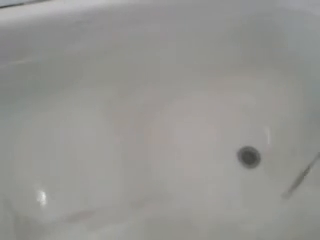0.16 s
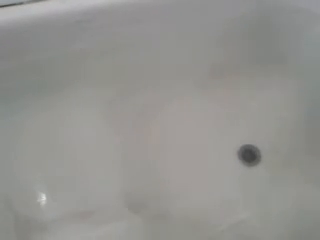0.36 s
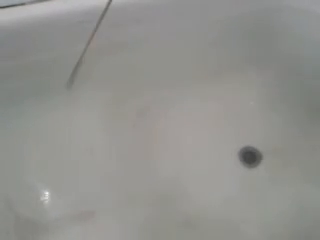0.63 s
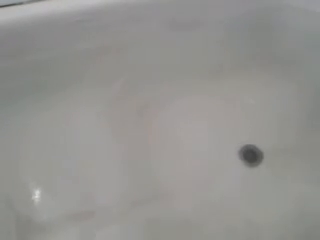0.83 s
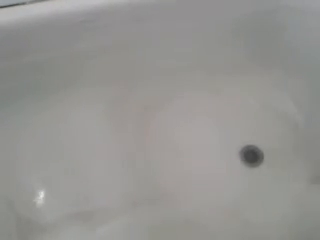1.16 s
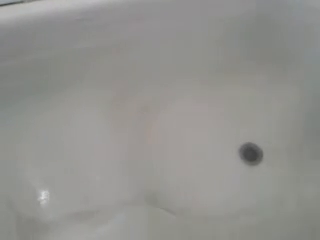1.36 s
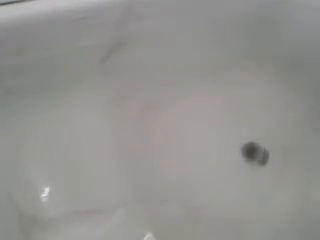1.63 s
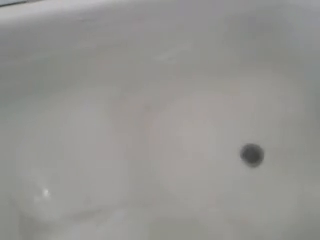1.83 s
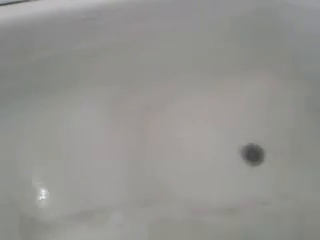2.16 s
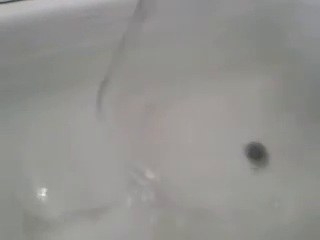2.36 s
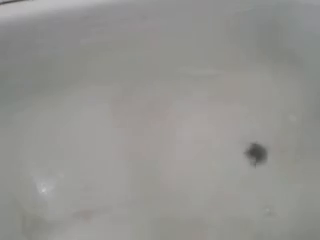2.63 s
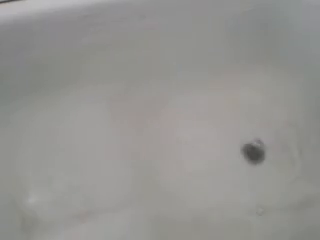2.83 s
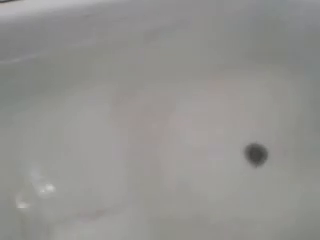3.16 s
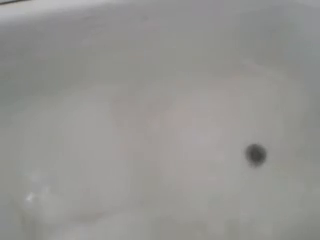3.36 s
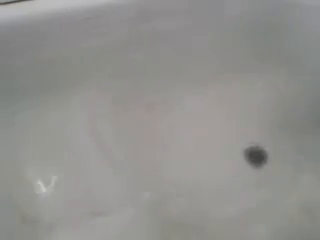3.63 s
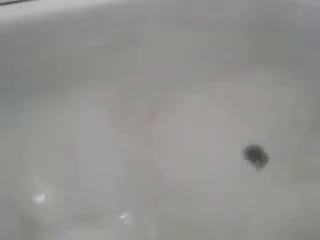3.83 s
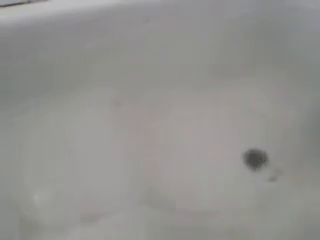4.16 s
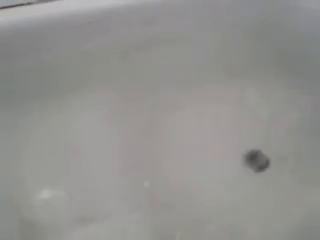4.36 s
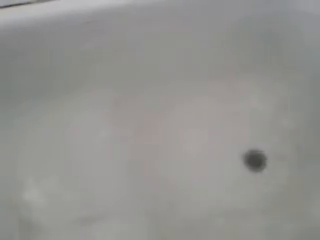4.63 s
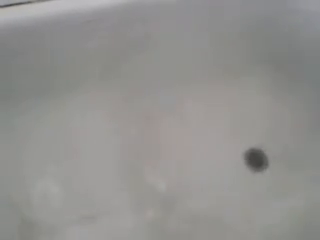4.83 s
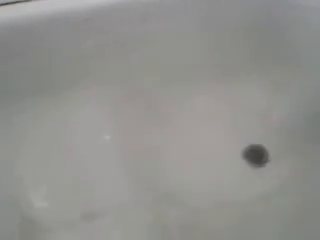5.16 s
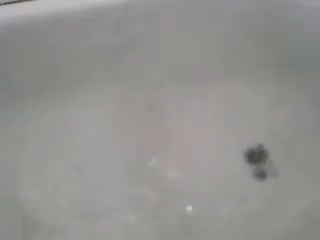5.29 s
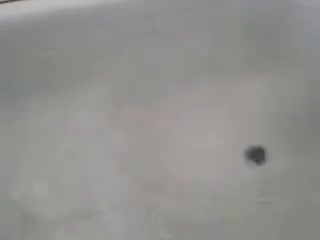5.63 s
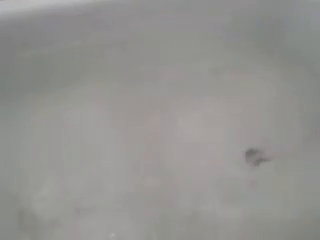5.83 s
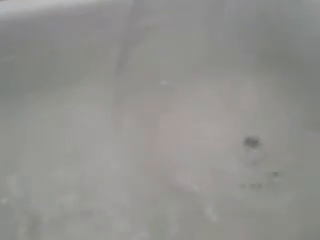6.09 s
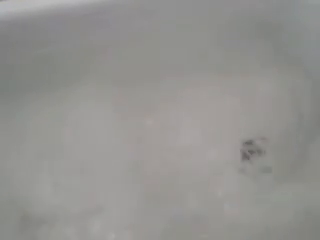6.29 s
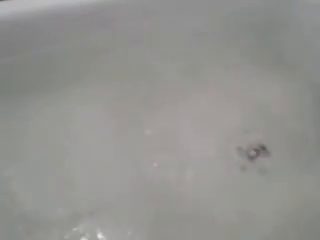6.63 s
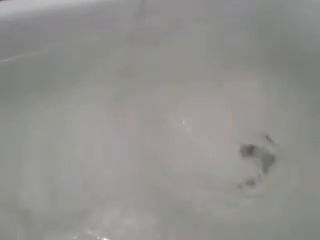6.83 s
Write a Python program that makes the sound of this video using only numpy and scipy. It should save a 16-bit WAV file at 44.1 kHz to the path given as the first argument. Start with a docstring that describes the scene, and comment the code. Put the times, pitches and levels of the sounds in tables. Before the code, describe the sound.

Water drips, laps and bubbles in a bathtub as a small lure is drawn around, growing busier and louder.

```python
"""A small metal lure is drawn round and round on a line through a bathtub, faster and faster.
First one drop plinks and two hard clacks ring in the bathroom, over a low hum that soon turns faint.
Then wavelets lap and more drops land, each trapping air that rings as a bubble. From about two seconds
on, air pockets glug with a rising pitch, and a spray of tiny bubbles thickens toward the end.
All along, tub walls and tiles echo the water over a soft room hiss."""
import sys
import numpy as np
from scipy import signal
from scipy.fft import rfft, irfft
from scipy.io import wavfile

SR = 44100
rng = np.random.default_rng(int(sys.argv[2]) if len(sys.argv) > 2 else 0)


def dump(signal):
    """Clip the signal to [-1, 1] and save it as 16-bit WAV at the path in sys.argv[1]."""
    limited = np.clip(np.atleast_2d(signal).T, -1, 1)
    pcm = np.round(limited * 32767).astype(np.int16)
    wavfile.write(sys.argv[1], SR, pcm)


N = 307377

# drops that stand out, each trapping a bubble:
# (time [s], pitch [Hz], peak level [dB], time to fade to about a third [cycles])
DROPS = [(.019, 5720, -36.5, 10.5), (1.094, 1930, -40, 4.3), (1.094, 3580, -37.5, 0.56),
         (1.267, 4700, -38, 2.1), (1.318, 2130, -46, 19), (1.552, 3900, -39, 4.7), (2.058, 5630, -42.5, 12),
         (2.084, 2650, -37, 1.6), (2.134, 5000, -29.5, 2.8), (2.279, 3220, -38.5, 3.9),
         (2.326, 5040, -41.5, 24), (2.409, 1720, -48, 12), (2.57, 2994, -46, 18), (2.579, 6600, -38, 11),
         (2.715, 5740, -39, 23), (2.805, 4630, -34.5, 13), (2.815, 4160, -30, 12), (2.815, 6120, -34.5, 13),
         (2.823, 3750, -26.5, 5), (3.076, 5300, -35.5, 7), (3.121, 3050, -42.5, 10), (3.186, 6250, -33, 20),
         (3.314, 6320, -41.5, 9.9), (3.345, 4970, -35, 5.7), (3.369, 4700, -36.5, 6.3),
         (3.433, 5104, -40, 16), (3.467, 6000, -39, 7), (3.492, 5380, -39.5, 13), (3.618, 6540, -37, 24.3),
         (3.650, 5203, -33.5, 7), (3.711, 6070, -23, 2.6), (3.839, 5800, -41, 11), (3.886, 3000, -41, 4.9),
         (3.903, 5170, -39, 8), (3.9649, 6090, -20.5, 3.6), (4.058, 5400, -30.5, 11.5),
         (4.1, 6170, -36, 20), (4.235, 5800, -26.5, 8), (4.311, 5200, -31, 9), (4.328, 3220, -36, 2),
         (4.455, 5830, -35.5, 11), (4.551, 6120, -28.5, 19), (4.572, 5690, -19, 6.1),
         (4.589, 5500, -27.5, 4.5), (4.644, 5070, -22.5, 8.3), (4.646, 3160, -25.5, 2.4),
         (4.657, 5600, -25, 5.8), (4.679, 3850, -31, 17), (4.737, 5850, -28.5, 11),
         (4.74, 3410, -24.5, 2.3), (4.794, 6420, -31.5, 18), (4.872, 5300, -29.5, 5.3),
         (4.93, 6130, -26, 10.4), (5.068, 5870, -37.5, 9), (5.125, 6150, -19, 5.5),
         (5.147, 3120, -29.5, 12), (5.149, 5300, -25, 6.4), (5.179, 6700, -30, 24), (5.181, 2390, -37, 30),
         (5.196, 7200, -23.5, 9), (5.262, 6160, -25.5, 6.9), (5.342, 6000, -23.5, 4.8),
         (5.416, 4750, -23.5, 7.2), (5.491, 2460, -25, 1.1), (5.492, 5130, -31.5, 3.6),
         (5.518, 4300, -31, 6.1), (5.561, 4600, -23, 7.7), (5.657, 2964, -26.5, 8.7),
         (5.708, 3410, -35, 21), (5.717, 1680, -27.5, 2.8), (5.794, 3395, -35, 45),
         (5.795, 1376, -31, 11.3), (5.806, 3660, -23.5, 8.5), (5.842, 6950, -25.5, 28),
         (5.847, 5930, -14.5, 3.6), (5.854, 2678, -19.5, 3.5), (5.967, 5430, -27.5, 15),
         (5.996, 6630, -25.5, 9.5), (5.998, 2500, -31.5, 5.5), (6.015, 4550, -29, 9.6),
         (6.0345, 2897, -18, 8.7), (6.0351, 6380, -19.5, 11), (6.036, 3840, -22.5, 12),
         (6.184, 6340, -27.5, 11), (6.225, 5180, -27.5, 24), (6.233, 4300, -20.5, 20),
         (6.237, 5770, -13.5, 3), (6.239, 2310, -27.5, 4.9), (6.268, 5700, -20.5, 6.1),
         (6.271, 2940, -30.5, 7), (6.302, 5270, -28.5, 10), (6.34, 2770, -27.5, 10.4),
         (6.354, 6440, -14.5, 9.5), (6.354, 2265, -34, 21), (6.39, 5540, -21.5, 5.6),
         (6.396, 4300, -21.5, 2.9), (6.513, 5460, -31, 14), (6.595, 5020, -18, 5), (6.645, 5880, -28, 23.7),
         (6.844, 1924, -29.5, 3), (6.847, 2890, -22, 1.5), (6.941, 3490, -28, 13)]


def spray(spots, base_per_s=200, base_db=-50, doubling_db=7.5):
    """The line tears the surface into bubbles: high plinks, ticks and crackle, lower burble and gurgle."""
    fine_db, coarse_db = stirring()
    rate = base_per_s * 2 ** ((fine_db - base_db) / doubling_db)  # louder spray has more bubbles
    plinks = swarm(spots, fine_db - 7, .16 * rate, low_hz=2646, high_hz=5570, cycles=26, scatter_db=9)
    ticks = swarm(spots, fine_db - 5, .5 * rate, low_hz=4530, high_hz=7110, cycles=17, scatter_db=10.5)
    crackle = swarm(spots, fine_db - 6, 4 * rate, low_hz=2640, high_hz=8640, cycles=1.6, scatter_db=16)
    burble = swarm(spots, coarse_db - 7, 1.1 * rate, low_hz=1075, high_hz=2840, cycles=5.8, scatter_db=23)
    gurgle = swarm(spots, coarse_db - 9.5, .5 * rate, low_hz=1355, high_hz=1865, cycles=8, scatter_db=15)
    return plinks + ticks + crackle + burble + gurgle


def stirring(clumps_per_s=35, clump_db=3, still_db=-64, split_hz=3800):
    """Levels in dB of fine spray and larger bubbles, stirred up by the lure and thrown up by drops."""
    # how hard the lure stirs: (time [s], fine spray [dB], larger bubbles [dB])
    stir_levels = [(1.0, -65, -70), (1.9, -66, -70.5), (2.25, -62, -62.5), (2.43, -65, -65),
                   (3.08, -62, -62), (3.59, -55, -63), (4.04, -54.5, -65.5), (4.26, -53, -61.5),
                   (4.51, -52, -59.5), (4.74, -47, -67.5), (4.96, -49, -76), (5.16, -47.5, -64.5),
                   (5.34, -45, -52), (5.77, -49.5, -54), (5.96, -48.5, -56), (6.4, -44.5, -50),
                   (6.67, -49, -50), (6.97, -44.5, -47)]
    clock = np.arange(N) / SR
    jumps = rng.standard_normal(1000)
    clumps = undb(clump_db * np.interp(clock * clumps_per_s, np.arange(len(jumps)), jumps))
    power = undb(curve(stir_levels, clock)) ** 2
    broken = power ** 2 / (power ** 2 + undb(still_db) ** 4)  # below still_db the surface hardly breaks
    fine, coarse = power * broken * unit(clumps) ** 2
    # each drop's spatter swells quickly, then settles
    t = np.arange(int(.5 * SR)) / SR
    spatter = (1 - np.exp(-t / .003)) * np.exp(-t / .014)
    spatter /= spatter.max()
    for s, hz, db, _ in DROPS:
        fine_share = 1 / (1 + (split_hz / hz) ** 4)  # higher drops throw mostly fine spray
        add(fine, s, fine_share * undb(db - 31) ** 2 * spatter)
        add(coarse, s, (1 - fine_share) * undb(db - 30) ** 2 * spatter)
    return 10 * np.log10(fine), 10 * np.log10(coarse)


def swarm(spots, level_db, rate, low_hz, high_hz, cycles, scatter_db):
    """Small bubbles ring at random, about `rate` of them a second; level_db sets their joint level."""
    births = np.flatnonzero(rng.random(N) < rate / SR)
    chance = rng.random((len(births), 3))
    gains = unit(undb(scatter_db * chance[:, 0] ** 2))
    out = np.zeros((spots, N))
    for k, (i, gain, (_, pitch, ring)) in enumerate(zip(births, gains, chance)):
        hz = low_hz + (high_hz - low_hz) * pitch
        ring_cycles = cycles * (.5 + ring)
        overlap = max(rate[i] * ring_cycles / hz / 4, .013)  # the lower limit keeps calm water quiet
        add(out[k % spots], i / SR, gain * undb(level_db[i]) / np.sqrt(overlap) * bubble(hz, ring_cycles))
    return out


def bubble(hz, cycles, glide=.05, swell_cycles=.93):
    """A bubble rings and dies away; its pitch creeps up as it nears the surface."""
    turns = np.arange(int(5 * cycles * SR / hz)) * hz / SR
    loudness = (1 - np.exp(-turns / swell_cycles)) * np.exp(-turns / cycles)
    phase = 2 * np.pi * turns * (1 + glide * turns / cycles / 2)
    return loudness / loudness.max() * np.sin(phase)


def drops(spots, tick_db=-8, splat_db=-15):
    """Each drop ticks as it lands, splats for a few milliseconds and leaves a ringing bubble."""
    t = np.arange(int(.02 * SR)) / SR
    fade = np.exp(-t / .0025)
    tick = bubble(hz=4600, cycles=.9, swell_cycles=.5)
    out = np.zeros((spots, N))
    for k, (s, hz, db, cycles) in enumerate(DROPS):
        noise = rng.standard_normal(len(t))
        splat = resonate(resonate(noise, hz, width_hz=hz), hz, width_hz=hz)
        add(out[k % spots], s, undb(db + tick_db) * tick)
        add(out[k % spots], s, undb(db + splat_db) * fade * unit(splat))
        add(out[k % spots], s, undb(db) * bubble(hz, cycles))
    return out


def glugs(spots, overtone_db=-22):
    """A pocket of air holds its note, then sweeps up ever faster as it opens to the surface."""
    # air pockets closing behind the lure:
    # (time [s], starting pitch [Hz], level [dB], length [s], rise [octaves])
    pockets = [(2.186, 1222, -41.5, 0.011, 0.089), (2.205, 1657, -38.5, 0.015, 1.12),
               (3.728, 1100, -49, 0.016, 0.27), (4.546, 911, -48.5, 0.029, 0.14),
               (5.353, 1047, -34, 0.04, 1.02), (5.493, 1674, -36, 0.02, 0.08),
               (5.505, 740, -46, 0.031, 0.43), (5.889, 1218, -32.5, 0.02, 0.87),
               (6.109, 1770, -29.5, 0.01, 0.21), (6.110, 877, -35, 0.05, 1),
               (6.635, 854, -32.5, 0.048, 1.32)]
    out = np.zeros((spots, N))
    for k, (s, hz, db, length, octaves) in enumerate(pockets):
        age = np.linspace(0, 1, int(length * SR))
        # the pocket's wobbling walls shake its pitch and its loudness
        wobbles = rng.standard_normal((2, 18))
        shake, throb = (np.interp(age, np.linspace(0, 1, len(row)), row) for row in wobbles)
        pitch_hz = hz * (1 + .06 * shake) * 2 ** (octaves * age ** 2)
        phase = 2 * np.pi * np.cumsum(pitch_hz) / SR
        tone = np.sin(phase) + undb(overtone_db) * np.sin(2 * phase)
        flutter = unit(undb(3.5 * throb))
        swell = np.interp(age, [0, .1, .55, .9, 1], [0, 1, 1, .6, 0])
        add(out[k % spots], s, undb(db) * swell * flutter * tone)
    return out


def laps(spots, count=14, spread=.1, cycles=5):
    """A lapping wavelet folds in a handful of bubbles of about one size."""
    # wavelets meeting the tub's side: (time [s], pitch [Hz], level [dB])
    wavelets = [(.87, 1484, -56.5), (1.55, 925, -63.5), (1.76, 684, -62), (2.04, 1443, -60),
                (2.212, 2400, -52.5), (2.83, 1608, -51.5), (3.175, 1444, -56), (3.74, 1320, -70),
                (4.115, 2140, -46.5), (4.12, 1236, -60.5), (4.27, 1524, -58), (4.37, 1670, -57.5),
                (4.48, 1190, -57.5), (5.22, 370, -64), (5.51, 358, -61), (5.755, 1190, -48),
                (6.0, 1225, -49), (6.125, 1430, -40.5), (6.43, 880, -48.5), (6.74, 820, -55.5)]
    out = np.zeros((spots, N))
    for k, (s, hz, db) in enumerate(wavelets):
        fold_s = min(50 / hz, .053)  # a bigger, lower wavelet takes longer to fold
        overlap = count / fold_s * cycles / hz / 2
        for j, (when, pitch, strength) in enumerate(rng.random((count, 3))):
            start_s = s + fold_s * (j + when) / count
            bubble_hz = hz * (1 + spread * (2 * pitch - 1))
            gain = undb(db) * (.5 + strength) / np.sqrt(overlap)
            add(out[k % spots], start_s, gain * bubble(bubble_hz, cycles))
    return out


def clacks(hold_s=.027):
    """Hard clacks heard mostly by way of the tiles: a dense ring whose low notes come late and stay."""
    # clacks away from the water: (time [s], level [dB])
    hits = [(0.446, -38.5), (.690, -35.5)]
    # notes the clacking thing rings with: (pitch [Hz], width [Hz], relative level [dB])
    notes = [(270, 44, -43), (410, 96, -17.5), (680, 370, -14), (1802, 45, -6.5), (2620, 380, -4.5),
             (2853, 14, 4.5), (3420, 11, 9), (3740, 26, 9.5), (3970, 134, 3), (5840, 100, 0.5),
             (6150, 600, -7)]
    t = np.arange(int(.5 * SR)) / SR
    out = np.zeros(N)
    for s, db in hits:
        ring = 0
        for hz, width_hz, note_db in notes:
            rise_s, fade_s = (.02, .81) if hz < 1000 else (.002, .29)
            loudness = (1 - np.exp(-t / rise_s)) * undb(-60 * np.maximum(t - hold_s, 0) / fade_s)
            ring += undb(note_db) * loudness * resonate(rng.standard_normal(len(t)), hz, width_hz)
        add(out, s, undb(db) * ring / np.std(ring[t < .04]))
    return out


def bathroom(x, wall_db=-8, tile_db=-7, hollow_db=-3, tile_fade_s=.22, hollow_fade_s=.27):
    """The sound from one spot, plus quick echoes off the tub's walls and the ring of the tiled room."""
    t = np.arange(int(.5 * SR)) / SR
    noise = rng.standard_normal((3, len(t)))
    bounces = rng.random(len(t)) < .06
    walls = noise[0] * bounces * (t > .0015) * np.exp(-t / .005)
    tiles = noise[1] * (t > .004) * undb(-60 * t / tile_fade_s)
    hollow = noise[2] * (t > .004) * undb(-60 * t / hollow_fade_s)
    walls, tiles, hollow = (part / np.linalg.norm(part) for part in (walls, tiles, hollow))
    # the hollow of the tub holds the low notes longer
    hollow = signal.lfilter(*signal.butter(2, 2200, fs=SR), hollow)
    echoes = undb(wall_db) * walls + undb(tile_db) * tiles + undb(hollow_db) * hollow
    return x + signal.fftconvolve(x, echoes)[:N]


def low_hum():
    """A low two-note hum, loudest in the first second and around the clacks, then faint."""
    # loudness of the hum: (time [s], level [dB])
    hum_levels = [(0, -60.5), (.4, -72), (.8, -61.5), (1.05, -71.5), (2, -79.5), (7, -76)]
    noise = rng.standard_normal(N)
    low = resonate(resonate(noise, 267.6, 34), 267.6, 34)
    high = resonate(resonate(noise, 370, 90), 370, 90)
    level_db = curve(hum_levels, np.arange(N) / SR)[0]
    return unit(low + undb(-4.5) * high) * undb(level_db)


def hiss(level_db=-57.5):
    """The room's soft, steady background noise."""
    # strength of the hiss from bass to treble: (pitch [Hz], relative level [dB])
    hiss_shape = [(40, -6.5), (75, -26), (110, -26.5), (160, -23), (260, -13.5), (400, -7.5), (700, -5.5),
                  (1100, -9.5), (1600, -8), (2300, -12.5), (5000, -14), (7200, -13.5)]
    hz, db = np.transpose(hiss_shape)
    all_hz = np.maximum(np.fft.rfftfreq(N, 1 / SR), 1)
    gains = undb(np.interp(np.log(all_hz), np.log(hz), db))
    return undb(level_db) * unit(irfft(rfft(rng.standard_normal(N)) * gains, N))


def undb(db):
    """Turn decibels into a number to multiply by."""
    return 10 ** (np.asarray(db) / 20)


def unit(x):
    """Scale a signal to an average strength (rms) of 1."""
    return x / np.sqrt(np.mean(x ** 2))


def curve(rows, t):
    """Read a table at times t, joining its rows with straight lines; its first column is time."""
    s, *columns = np.transpose(rows)
    return [np.interp(t, s, column) for column in columns]


def add(track, s, sound):
    """Mix a sound into a track, starting at s seconds."""
    i = int(np.clip(s * SR, 0, N - 1))
    track[i:i + len(sound)] += sound[:N - i]


def resonate(x, hz, width_hz):
    """Keep the part of a sound near one pitch; a narrower width rings longer."""
    return signal.lfilter(*signal.iirpeak(hz, hz / width_hz, fs=SR), x)


def scene(spots=6, glug_echo_db=-1):
    """Water sounds come from several spots, each with its own echoes; the nearer glugs echo less."""
    pockets = glugs(spots)
    echo_share = undb(glug_echo_db)
    tracks = drops(spots) + echo_share * pockets + laps(spots) + spray(spots)
    water = sum(bathroom(track) for track in tracks) + (1 - echo_share) * pockets.sum(axis=0)
    # the water sounds carry hardly any bass below about 260 Hz
    water = signal.sosfilt(signal.butter(3, 260, "high", fs=SR, output="sos"), water)
    return (water + clacks() + hiss() + low_hum())[None]


def record(dry, edge_hz=7100, top_hz=9100, leak_db=-33):
    """Cut the treble above edge_hz; a trace leaks past, and that is cut above top_hz."""
    narrow = signal.sosfilt(signal.ellip(7, .3, 42, edge_hz, fs=SR, output="sos"), dry)
    leaky = narrow + undb(leak_db) * dry
    return signal.sosfilt(signal.ellip(8, .3, 60, top_hz, fs=SR, output="sos"), leaky)


dry = scene()
out = record(dry)
dump(out)
```